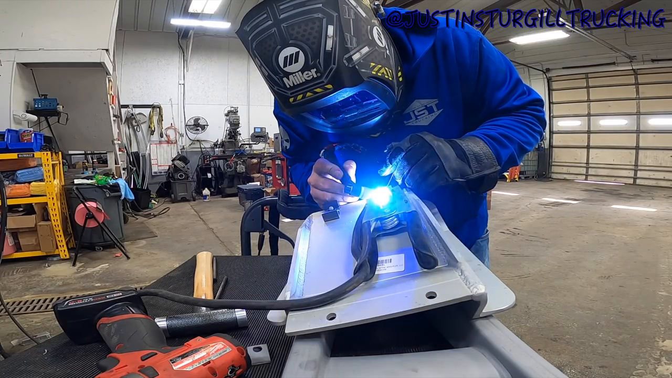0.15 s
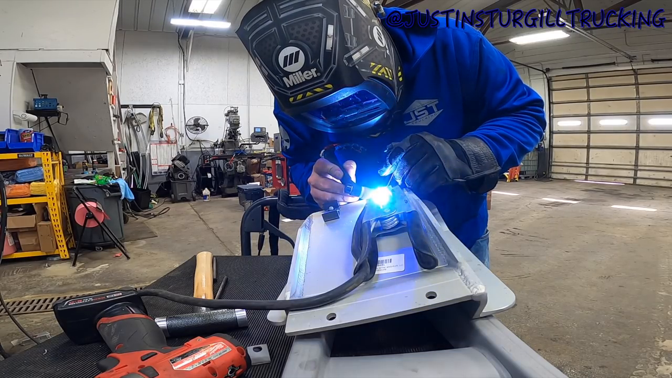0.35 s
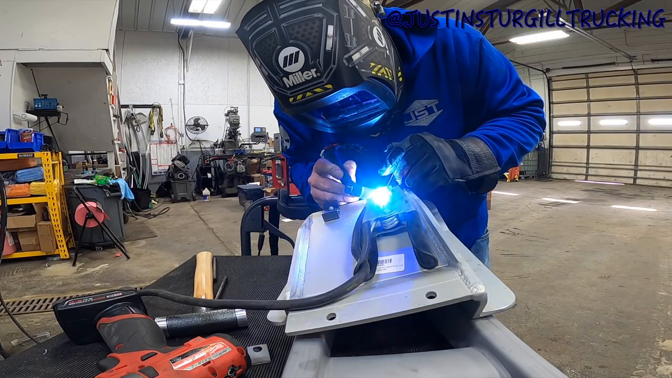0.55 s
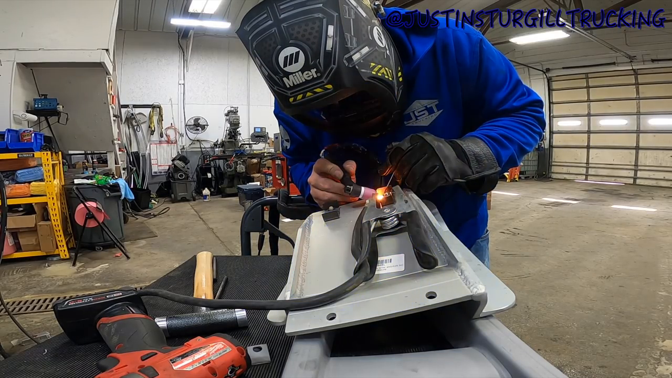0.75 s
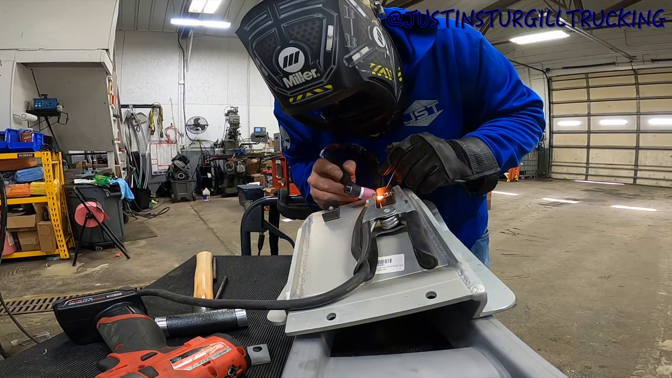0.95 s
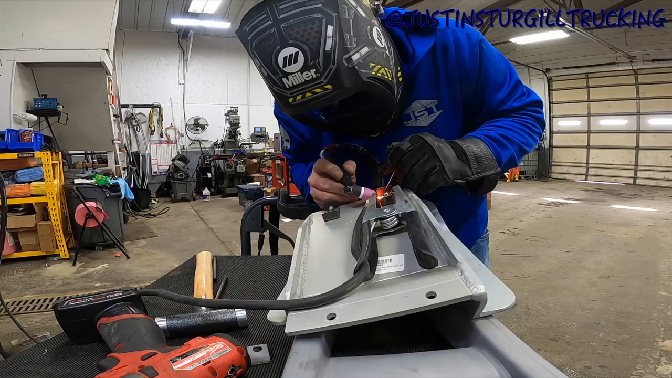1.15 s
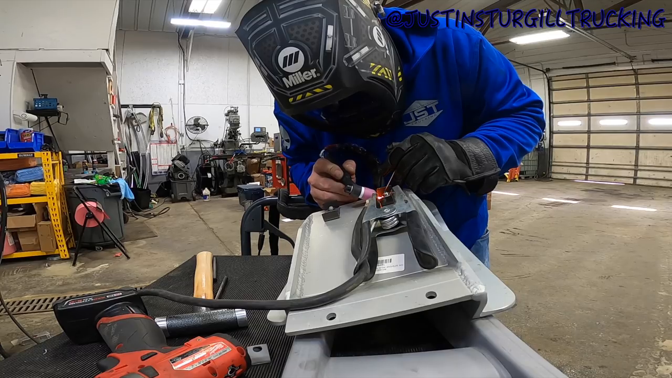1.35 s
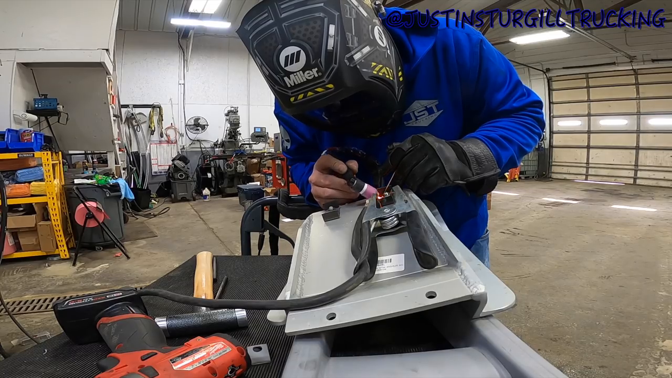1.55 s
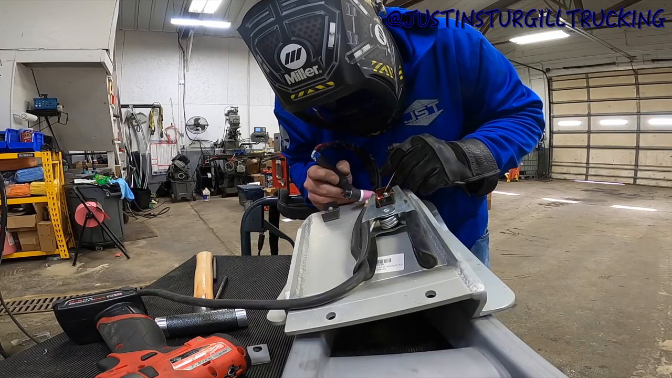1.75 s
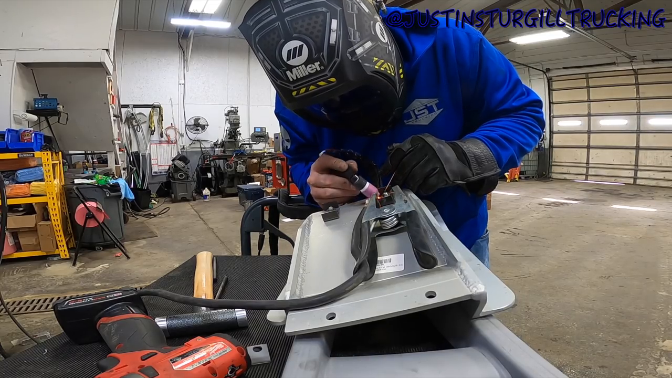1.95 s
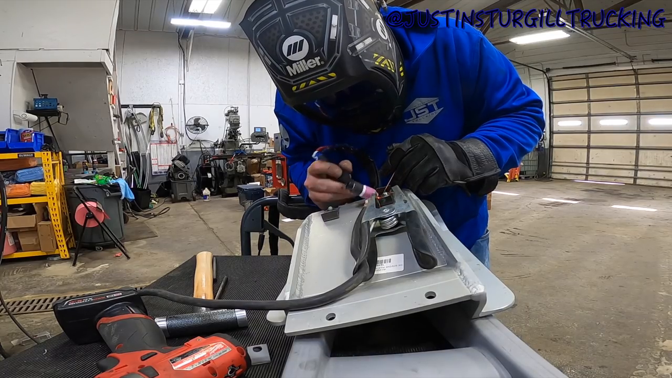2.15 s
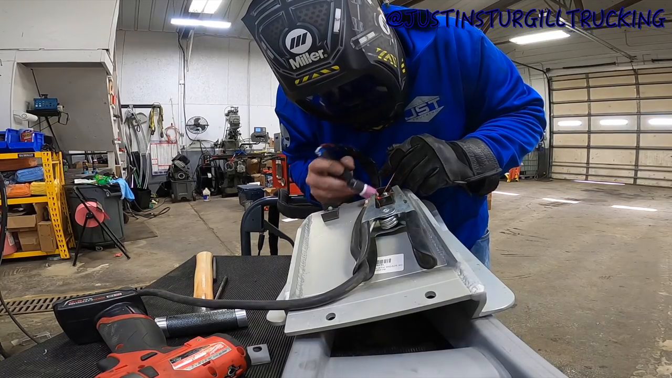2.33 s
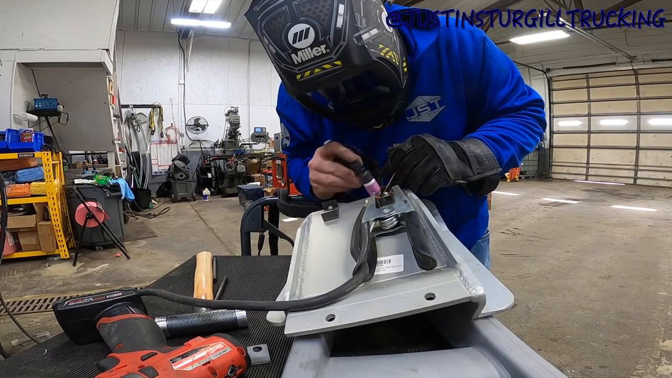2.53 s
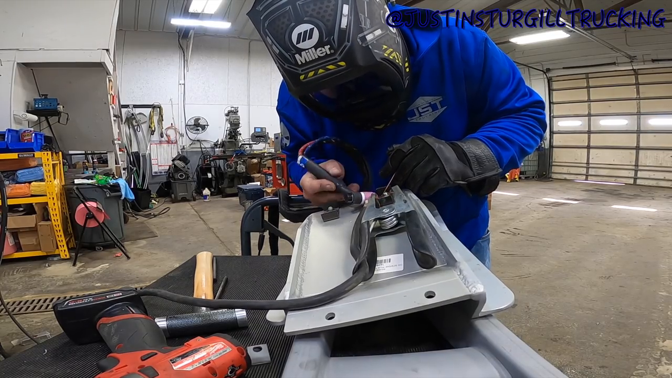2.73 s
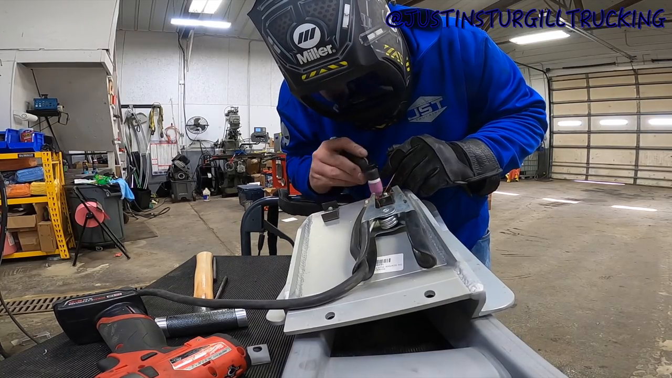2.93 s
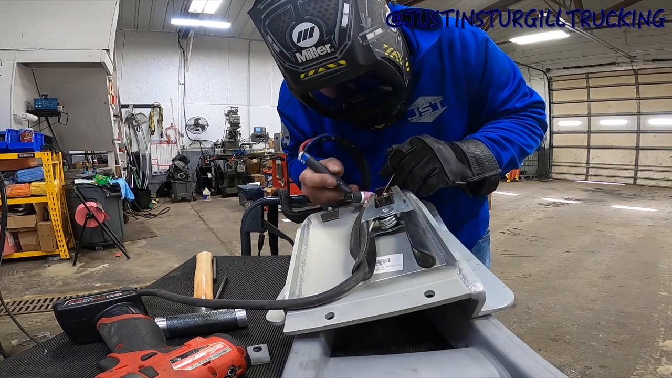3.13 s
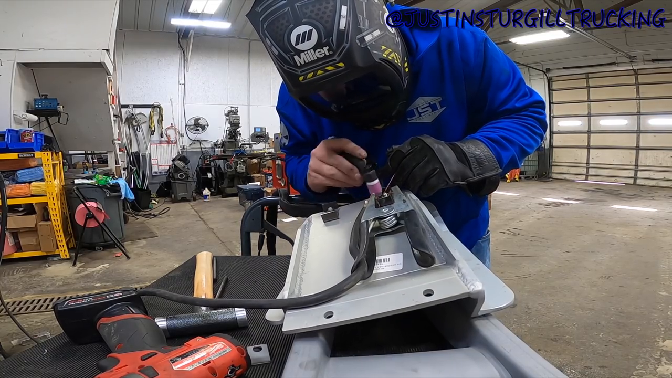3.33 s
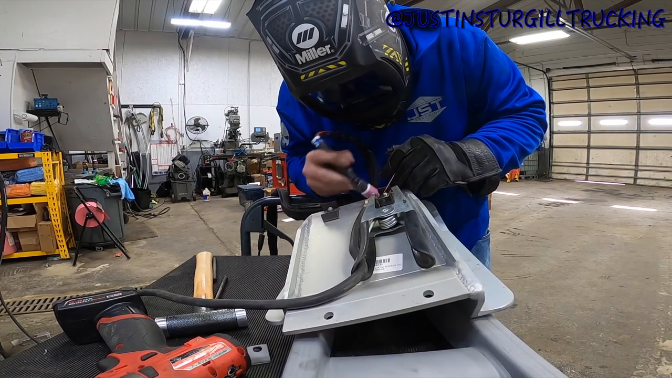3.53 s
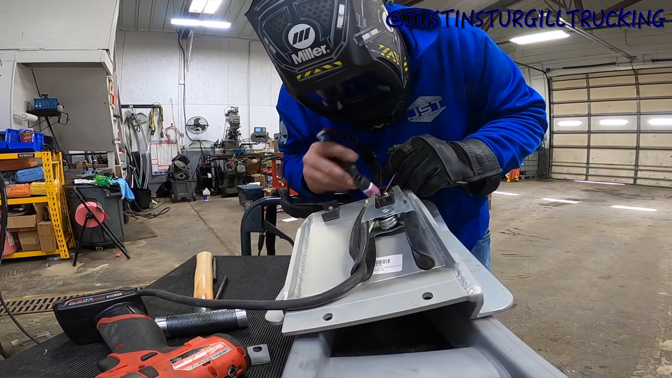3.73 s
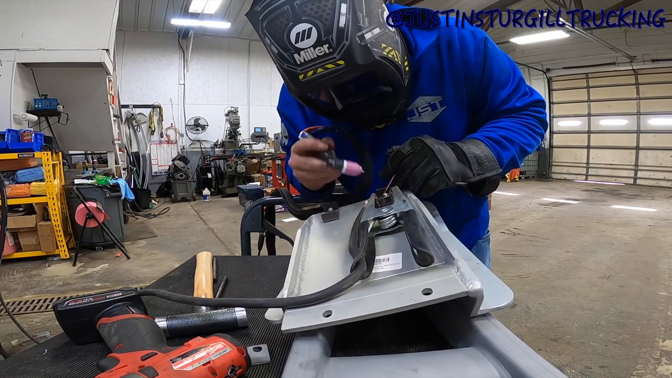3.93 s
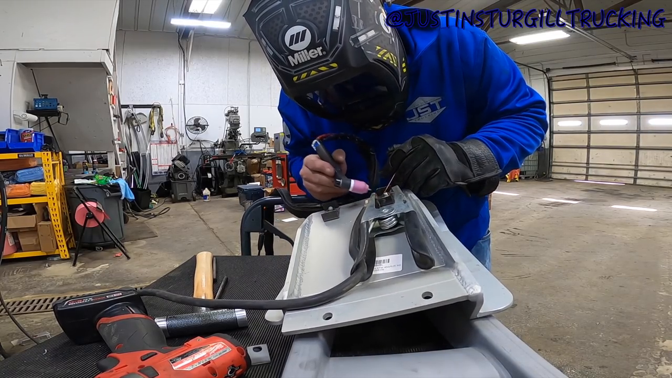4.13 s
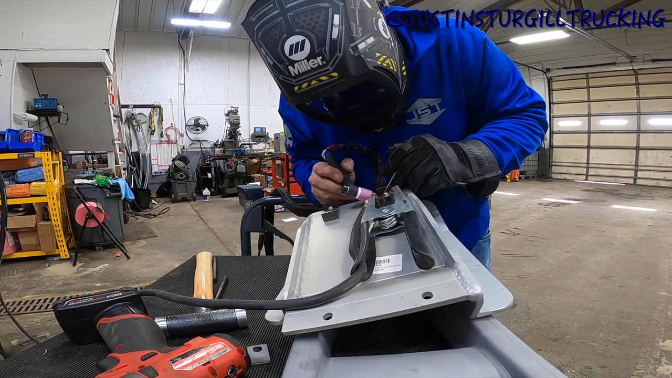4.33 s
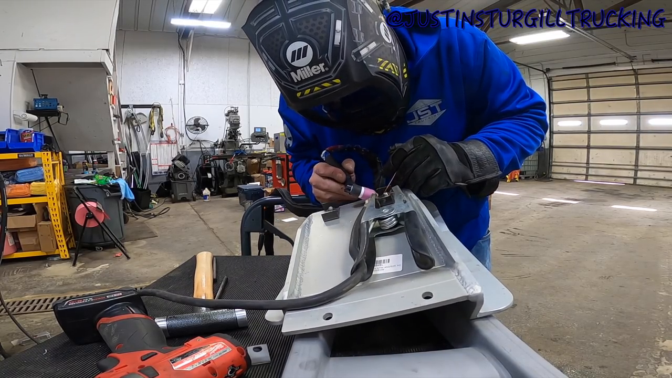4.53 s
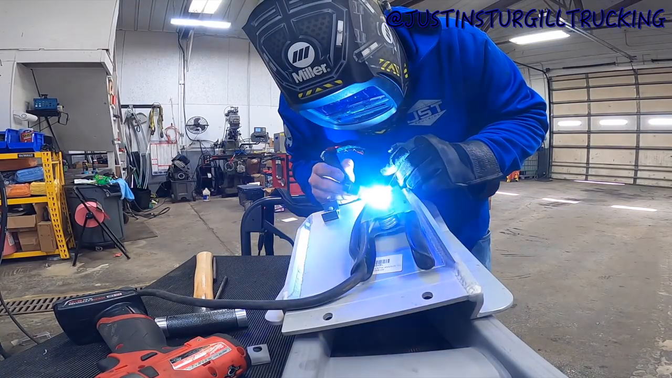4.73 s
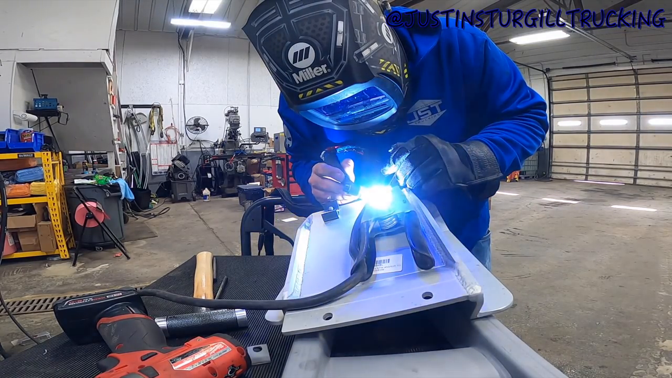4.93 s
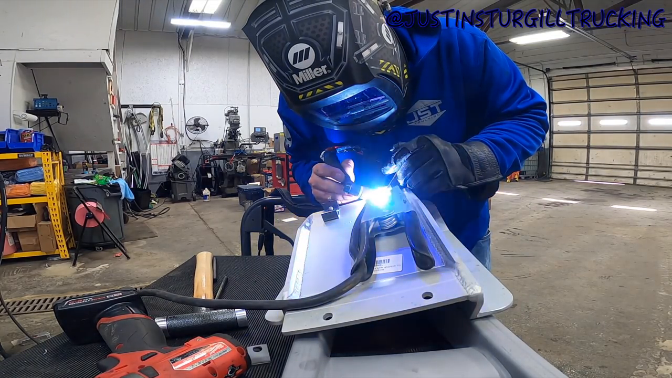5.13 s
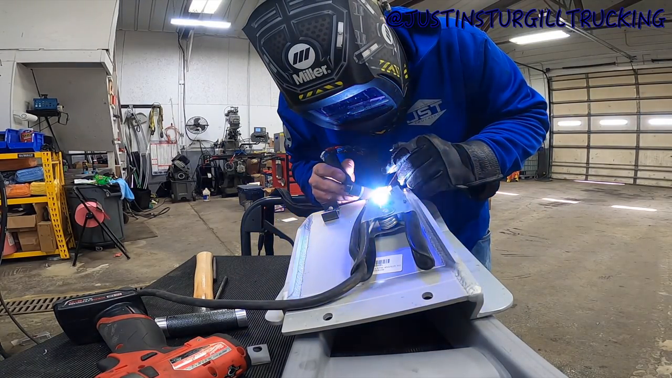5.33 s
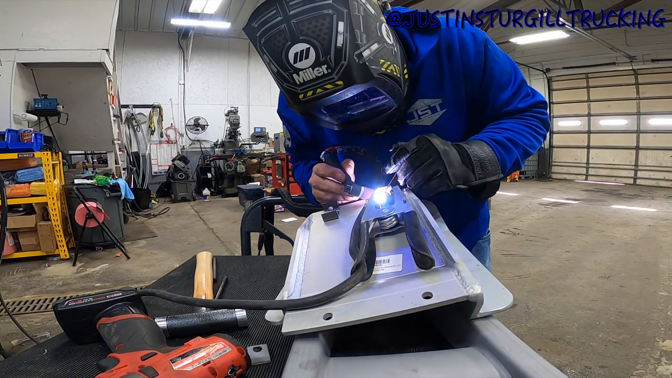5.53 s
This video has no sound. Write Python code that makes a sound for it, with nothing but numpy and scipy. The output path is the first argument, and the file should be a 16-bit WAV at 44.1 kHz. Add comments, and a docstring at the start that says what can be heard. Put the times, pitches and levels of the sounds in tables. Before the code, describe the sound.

A welder works close to the microphone. Steady airy gas hiss, with a quiet sputtering burn ending early; then gas alone over faint machine hum. The torch knocks and clinks on hollow metal, a lead rubs along it, and after a short pause the arc strikes abruptly with crackles and a much louder fizzing roar. Metal sounds leave a faint hall echo.

```python
"""Large workshop: a welder tacks small parts on a sheet-metal box, close to a small two-port microphone.
Shielding gas hisses from the torch cup throughout: noise through cup resonances. The arc burns twice and
roars, sizzles and spits: it swells the same jet, with flares and clicks on top. Between burns the torch taps
the box (decaying modes, noise cracks) and its lead drags (friction noise in resonances); soft low-mid noise
swells around them. Far machines: hum, fan tones, rumble, moving air; a faint echo follows the metal."""
import sys
import numpy as np
from scipy import signal
from scipy.fft import rfft, irfft, next_fast_len
from scipy.io import wavfile
from scipy.ndimage import uniform_filter1d

SR = 44100
rng = np.random.default_rng(int(sys.argv[2]) if len(sys.argv) > 2 else 0)


def log_audio(samples):
    """Write samples as a 16-bit WAV file to the path given in sys.argv[1]."""
    # one column per channel
    frames = np.atleast_2d(samples).T
    # limit to full scale, then quantise
    limited = np.clip(frames, -1, 1)
    pcm = np.round(limited * 32767).astype(np.int16)
    wavfile.write(sys.argv[1], SR, pcm)


N = 250488
T = np.arange(N) / SR
SIZE = next_fast_len(N + SR)
HZ = np.maximum(np.arange(SIZE // 2 + 1) * SR / SIZE, 1)


def from_db(db):
    """Decibels to gain."""
    return 10 ** (np.asarray(db) / 20)


def rms_one(x):
    """Scaled to unit power."""
    return x / np.sqrt(np.mean(x ** 2) + 1e-20)


def in_time(rows):
    """Curve columns at every sample."""
    s, *columns = np.transpose(rows)
    return [np.interp(T, s, c) for c in columns]


def column(rows, index):
    """One column of a frequency table at every spectral line, interpolated over log frequency."""
    return np.interp(np.log(HZ), np.log(np.array(rows)[:, 0]), np.array(rows)[:, index])


def filtered(x, response):
    """Sound through a spectral response."""
    return irfft(rfft(x, SIZE) * response, SIZE)[..., :N]


def causal(db):
    """Minimum-phase response for a dB curve, by folding its cepstrum."""
    cep = irfft(db * np.log(10) / 20, SIZE)
    cep[1:SIZE // 2] *= 2
    cep[SIZE // 2 + 1:] = 0
    return np.exp(rfft(cep))


def drift(rate_hz):
    """Slow chance with unit power: low-passed noise."""
    r = np.exp(-2 * np.pi * rate_hz / SR)
    return rms_one(signal.lfilter([1], [1, -2 * r, r * r], rng.standard_normal(N + SR))[SR:])


def peak(hz, width_hz):
    """Filter of one resonance, gain about 1 on top."""
    r = np.exp(-np.pi * width_hz / SR)
    return (1 - r * r) / 2 * np.array([1, 0, -1]), [1, -2 * r * np.cos(2 * np.pi * hz / SR), r * r]


def resonances(x, rows):
    """Parallel resonances, signs alternating, each passed twice for steep flanks."""
    out = 0
    for k, (hz, width_hz, db) in enumerate(rows):
        b, a = peak(hz, width_hz)
        out = out + (-1) ** k * from_db(db) * signal.lfilter(b, a, signal.lfilter(b, a, x))
    return out


def moving_resonance(x, centre_hz, width_hz):
    """Resonance on a moving pitch, retuned every 512 samples, passed twice."""
    out = np.zeros_like(x)
    first, second = np.zeros((2, 2)), np.zeros((2, 2))
    for i in range(0, N, 512):
        b, a = peak(centre_hz[i], width_hz)
        once, first = signal.lfilter(b, a, x[:, i:i + 512], zi=first)
        out[:, i:i + 512], second = signal.lfilter(b, a, once, zi=second)
    return out


def band(x, low_hz, high_hz):
    """Steep band-pass."""
    return signal.sosfilt(signal.butter(3, [low_hz, high_hz], "band", fs=SR, output="sos"), x)


def rms_band(x, low_hz, high_hz):
    """Band-pass that keeps the level of white noise."""
    return np.sqrt(SR / 2 / (high_hz - low_hz)) * band(x + 1e-18, low_hz, high_hz)


# the arc burns, one list per burn: time_s, roar_level_db
BURNS = [
    [(0, -38), (.3, -47.5), (.5, -39.5), (.73, -43)],
    [(4.7365, -29.5), (4.92, -28), (5.2, -27), (5.25, -36), (5.5, -34.5), (5.7, -55)],
]


def arc_level():
    """Strength of the arc in dB, and a gate that is open while it burns."""
    lit = sum((T >= rows[0][0]) * (T <= rows[-1][0]) for rows in BURNS)
    gate = uniform_filter1d(lit.astype(float), size=200, mode="nearest")
    return in_time(np.concatenate(BURNS))[0], gate


SWING_S, SWING_OUT_S, SWING_BACK_S, SWING_DB = 4.113, 0.14, 0.12, -16


def swing_db():
    """The cup swings away from the microphone once: the hiss dips and returns as two Gaussian halves."""
    return SWING_DB * np.exp(-((T - SWING_S) / np.where(T < SWING_S, SWING_OUT_S, SWING_BACK_S)) ** 2)


# cup-to-work resonance: time_s, pitch_hz
GAP = [(0, 2586), (1.6, 2577), (2.3, 2486), (2.7, 2430), (3.74, 2410), (4.7, 2550), (4.85, 2660),
       (5.68, 2560)]
GAP_WIDTH_HZ, GAP_DB, GAP_MEAN_HZ = 500, -3.5, 2552
# fixed resonance of the cup: pitch_hz, width_hz, level_db
CUP = [(3380, 550, 0)]
# roar of the jet, relative levels: pitch_hz, width_hz, level_db
ROAR = [(1620, 520, -1), (2160, 840, 2)]
# low resonance that only the arc excites: pitch_hz, width_hz, level_db
ARC_GROWL = [(1398, 550, 0)]
# colour of the hot sizzle against the cold gas, relative: pitch_hz, level_db
ARC_COLOUR = [(4200, 0.5), (4600, -8), (5200, -0.5), (6300, 4.5), (6900, 6), (7400, 1), (7900, 7.5),
              (9000, -0.5), (10600, 8), (12500, 0), (14800, 3)]
# bright band in the sizzle, moves with the hand: time_s, pitch_hz, level_over_sizzle_db
BRIGHT = [(0, 9100, 10), (0.7, 9000, 7), (1.6, 8850, 8), (2.1, 8500, 0), (2.5, 8900, -3), (3.5, 8850, 0),
          (3.72, 8700, 6), (4.0, 8800, 12), (4.08, 8850, -19), (4.17, 9050, 15), (4.3, 8550, -3),
          (4.7, 8450, 2), (4.8, 7850, 1), (5.68, 7900, -14)]
BRIGHT_WIDTH_HZ = 1050
GAS_DB, GAS_ROAR_DB, GAS_SIZZLE_DB = -32, -38.5, -44
SIZZLE_DB_PER_HZ = 0.0055   # stronger while the gap rings higher
SWING_ROAR_SHARE, SWING_SIZZLE_SHARE = 0.26, 0.17   # of the dB dip of the hiss
ARC_HISS_OVER_ROAR_DB, ARC_GROWL_OVER_ROAR_DB = -3, -8.5
ARC_SIZZLE_DB, SIZZLE_REF_ROAR_DB, SIZZLE_DB_PER_DB = -38, -32.5, 0.32
ARC_BASS_DB, BASS_REF_ROAR_DB, BASS_DB_PER_DB, BASS_FLUTTER_DB = -48.5, -28.5, 1, 1.5
GUST_DB = 0.7


def torch(jet):
    """Turbulent gas in the cup resonances, with roar and sizzle; arc and flares swell all of them at once."""
    gap_hz, = in_time(GAP)
    bright_hz, bright_db = in_time(BRIGHT)
    away_db = swing_db()
    arc_db, lit = arc_level()
    gust_db = GUST_DB * drift(15)

    gap = from_db(GAP_DB) * moving_resonance(jet, gap_hz, GAP_WIDTH_HZ)
    gas = rms_one(gap - resonances(jet, CUP))
    roar = rms_one(resonances(jet, ROAR))
    growl = from_db(ARC_GROWL_OVER_ROAR_DB) * rms_one(resonances(jet, ARC_GROWL))
    bass = rms_one(band(jet, 157, 680))
    cold = rms_one(band(jet, 3010, 22000))
    hot = rms_one(filtered(cold, causal(column(ARC_COLOUR, index=1))))

    # cold jet and arc add in power
    gas_gain = np.hypot(from_db(GAS_DB + away_db), lit * from_db(arc_db + ARC_HISS_OVER_ROAR_DB))
    roar_gain = np.hypot(from_db(GAS_ROAR_DB + SWING_ROAR_SHARE * away_db), lit * from_db(arc_db))
    out = gas_gain * from_db(gust_db) * gas - roar_gain * from_db(0.45 * gust_db) * roar

    dulled = from_db(SWING_SIZZLE_SHARE * away_db) * cold
    bright = from_db(bright_db) * moving_resonance(cold, bright_hz, BRIGHT_WIDTH_HZ)
    cold_db = GAS_SIZZLE_DB + SIZZLE_DB_PER_HZ * (gap_hz - GAP_MEAN_HZ)
    hot_db = ARC_SIZZLE_DB + SIZZLE_DB_PER_DB * (arc_db - SIZZLE_REF_ROAR_DB)
    sizzle = from_db(cold_db) * ((1 - lit) * dulled + bright) + lit * from_db(hot_db) * hot
    # lower and upper sizzle flicker apart
    out += from_db(0.63 * gust_db + 1.7 * drift(9.9)) * band(sizzle, 2380, 8350)
    out += from_db(1.5 * drift(9.3)) * band(sizzle, 7300, 15000)

    bass_db = ARC_BASS_DB + BASS_DB_PER_DB * (arc_db - BASS_REF_ROAR_DB) + BASS_FLUTTER_DB * drift(22)
    out += lit * (from_db(bass_db) * bass + from_db(arc_db) * growl)
    return out + flares(gas - roar + growl, hot, bass)


# the arc flares: start_s, level_db, length_s, treble_over_level_db
FLARES = [(0.3, -35, 0.06, -7), (0.417, -38, 0.035, -2), (0.535, -34, 0.022, -12), (0.583, -32.5, 0.03, -6),
          (4.668, -56, 0.025, 14), (4.7368, -17, 0.025, -4.5), (4.761, -19, 0.024, -22),
          (4.77, -29, 0.022, -7), (4.788, -30.5, 0.032, -2.5), (4.811, -19.5, 0.034, -11),
          (4.84, -20, 0.011, -10), (4.843, -40, 0.04, 1), (4.89, -39, 0.06, -4), (5.138, -27, 0.039, -38),
          (5.153, -43, 0.066, -29), (5.183, -25.5, 0.05, -41)]
FLARE_RISE_S, FLARE_FALL_S, FLARE_BASS_DB = 0.0031, 0.011, -24
SPLUTTER_DB, SPIT_DB = 1.6, 1.0


def flares(body, hot, bass):
    """Short swells of jet, spitting treble and bass; the arc column jumps about, so the level splutters."""
    out = np.zeros((2, N))
    splutter = from_db(SPLUTTER_DB * drift(160))
    spitting = rms_one(from_db(SPIT_DB * drift(400)) * hot)
    for s, db, length_s, treble_db in FLARES:
        i = slice(round(s * SR), round((s + length_s) * SR))
        rise, fall = (T[i] - s) / FLARE_RISE_S, (s + length_s - T[i]) / FLARE_FALL_S
        swell = from_db(db) * splutter[i] * np.clip(np.minimum(rise, fall), 0, 1)
        mix = 0.47 * body[:, i] + from_db(treble_db) * spitting[:, i] + from_db(FLARE_BASS_DB) * bass[:, i]
        out[:, i] += swell * mix
    return out


# single sparks: start_s, level_db, extra_treble_db
POPS = [(0.3152, -13, 0), (0.4198, -12, 0), (0.597, -14, 2), (4.7372, 2, -3), (4.7418, 0, -2),
        (4.7495, 0, -2), (4.7638, -2, -8), (4.769, 0, -9), (.7297, 1, 7)]
POP_TREBLE_DB = 5.5   # bare edge of every click, before the ports dull it


def pops():
    """Sparks as single-sample clicks through a body band and a treble band."""
    body, edge = np.zeros((2, N))
    for s, db, treble_db in POPS:
        body[round(s * SR)] = from_db(db)
        edge[round(s * SR)] = from_db(db + treble_db + POP_TREBLE_DB)
    # make-up gain for height lost in the bands
    body_gain, edge_gain = SR / 2 / 5000, SR / 2 / 12400
    return body_gain * band(body + 1e-18, 1620, 3400) + edge_gain * band(edge + 1e-18, 6200, 14000)


# torch on box, ring_share scales every t60 (hand on the box), floor 0.1:
# start_s, rim_db, lip_db, wall_db, flange_db, panel_db, ring_share
TAPS = [(1.793, -42, -41, -25, -40, -33, 0.17), (2.4924, -6, -34, -20, -36, -41, 0.56),
        (2.548, -49, -51, -57, -35, -32, 0.37), (2.6407, -27, -44, -25, -15.5, -20.5, 0.54),
        (2.6444, -23, -22, -17, -27, -25, 0.05), (2.666, -24, -27, -14, -3.5, -7, 0.13),
        (2.671, -21, -12, -10, -25, -18, 0.21), (2.675, -34, -36, -43, -9.5, -9, 0.25),
        (2.7072, -35, -25, -29, -14, -14.5, 0.19), (2.809, -36, -31, -20, -15.5, -20.5, 0.17),
        (2.8528, -15, -24, -19, -17, -28.5, 0.53), (2.9683, -29.5, -33.5, -27, -20, -24.5, 0.35),
        (3.0225, -26, -23, -17, -24, -32, 0.32), (3.0457, -29, -28, -26, -18.5, -19.5, 0.2),
        (3.1424, -26, -24, -24, -15, -23, 0.35), (3.1932, -3, -38, -12.5, -14.5, -23.5, 0.46),
        (3.3367, -34, -39, -27, -18.5, -20, 0.4), (3.359, -14, -6, -11, -7.5, -36, 0.26),
        (3.3693, -21, -35, -39, -7.5, -8.5, 0.25), (3.3815, -36, -38, -32, -13.5, -14, 0.36),
        (3.519, -42, -42, -21, -18, -21, 0.36), (3.555, -5, -33, -17, -19, -24, 0.4),
        (3.7179, -18, -22, -12, -23, -22, 0.27), (3.8736, -17, -9.5, -29, -21, -29, 0.21),
        (3.8808, -15, -9.5, -19, -18, -22.5, 0.22), (3.897, -8, -24.5, -20, -20.5, -19, 0.29),
        (3.9018, -25, -31, -35, -35, -35, 0), (4.1995, -38, -38, -24, -20.5, -31, 0.41)]
PAN_SPREAD_DB, MODE_SPREAD_DB = 0.8, 2
DETUNE_SHARE = 0.01   # the grip shifts a mode from tap to tap
LATE_HZ, LATE_WIDTH_HZ, LATE_RADIANS = 702, 160, 1.36   # modes near here: left port out of step


def strike(modes, index, lag_s, contact_s):
    """Every tap rings each mode with a strength and side of its own; the ring grows over the contact time."""
    out, t = np.zeros((2, N + SR)), T[:SR // 3]
    hz, db, t60_s = np.transpose(modes)[:, :, None]
    late = LATE_RADIANS * np.exp(-((hz - LATE_HZ) / LATE_WIDTH_HZ) ** 2)
    for tap in TAPS:
        strength, side, grip = rng.standard_normal((3, len(modes), 1))
        phase = 2 * np.pi * hz * (1 + DETUNE_SHARE * grip) * t
        decay_db = 60 * t / (t60_s * np.clip(tap[-1], .1, 1.5))
        size = from_db(tap[index] + db + MODE_SPREAD_DB * strength - decay_db) * (1 - np.exp(-t / contact_s))
        left = size * from_db(PAN_SPREAD_DB * side) * np.sin(phase - late)
        right = size * from_db(-PAN_SPREAD_DB * side) * np.sin(phase)
        rim_over_flange = tap[1] > tap[4]
        at = round((tap[0] + lag_s * rim_over_flange) * SR)
        out[:, at:at + len(t)] += [np.sum(left, axis=0), np.sum(right, axis=0)]
    return out[:, :N]


# modes of the box rim: pitch_hz, level_db, t60_s
RIM = [(1786, -2.5, 0.15), (1872, 5, 0.062), (1948, -0.5, 0.051), (2094, -0.5, 0.026), (2210, -0.5, 0.048),
       (2160, -26, 0.059), (2580, -18.5, 0.1)]
# modes of the lip: pitch_hz, level_db, t60_s
LIP = [(1639, 3, 0.1), (1580, -12.5, 0.056)]
# modes of the wall: pitch_hz, level_db, t60_s
WALL = [(1117, -8, 0.029), (1310, -8, 0.052), (1403, 6, 0.1)]
# modes of the flange: pitch_hz, level_db, t60_s
FLANGE = [(518, 1.5, 0.075), (515.5, 1, 0.13), (580, 1, 0.049), (715, -9, 0.032), (859, 5, 0.044),
          (1030, -8.5, 0.07)]
# modes of the wide panel: pitch_hz, level_db, t60_s
PANEL = [(183, -7, 0.15), (281, -6, 0.16), (466, -10, 0.36), (467, -5, 0.34), (612, -13, 0.42),
         (688, -4, 0.38), (766.5, -5.5, 0.28), (801, -9, 0.21), (964, -12.5, 0.25), (1066, -14.5, 0.2)]
PANEL_LAG_S, CONTACT_S = 0.00292, 0.0035
RIM_CONTACT_S = 0.0014   # stiff rim and lip are met faster


def box():
    """Rim, lip and wall answer at once, flange and panel a little later when the rim outweighs the flange."""
    out = strike(RIM, index=1, lag_s=0, contact_s=RIM_CONTACT_S)
    out += strike(LIP, index=2, lag_s=0, contact_s=RIM_CONTACT_S)
    out += strike(WALL, index=3, lag_s=0, contact_s=CONTACT_S)
    out += strike(FLANGE, index=4, lag_s=PANEL_LAG_S, contact_s=CONTACT_S)
    out += strike(PANEL, index=5, lag_s=PANEL_LAG_S, contact_s=CONTACT_S)
    return out


# cracks of hard contacts: start_s, level_db, treble_over_level_db, snap_over_level_db
CRACKS = [(2.49, -15, 0, -22), (2.857, -33, 9, -8), (3.3573, -30, 3, -8), (3.5558, -20.5, 5, 15),
          (3.718, -22, 3, 0), (3.875, -21, 5, -9), (3.8804, -18, -1, -20), (3.8951, -9, -8, -2.5),
          (3.9006, -9, -7, -10), (3.908, -17, 3.5, -22)]
CRACK_T60_S, CRACK_EDGE_T60_S, SNAP_T60_S = 0.045, 0.05, 0.011


def cracks():
    """Hard contacts crack: short dying noise bursts in three bands, the snap dying first."""
    body, edge, snap = np.zeros((3, N + SR))
    t = T[:SR // 20]
    for s, db, treble_db, snap_db in CRACKS:
        grit = rng.standard_normal(len(t))
        i = slice(round(s * SR), round(s * SR) + len(t))
        body[i] += from_db(db - 60 * t / CRACK_T60_S) * grit
        edge[i] += from_db(db + treble_db - 60 * t / CRACK_EDGE_T60_S) * grit
        snap[i] += from_db(db + snap_db - 60 * t / SNAP_T60_S) * grit
    return rms_band(body[:N], 2140, 2840) + rms_band(edge[:N], 4250, 5200) + rms_band(snap[:N], 4500, 13000)


# swell of high ring, low ring, rumble, and one catch of the high ring:
# loudest_s, level_db, rise_db_per_s, fall_db_per_s
DRAG = [(4.117, -37.5, 37, 43), (4.25, -35, 114, 80), (3.94, -29.5, 60, 100), (4.0685, -19, 12000, 4000)]
# high ring of the box walls: pitch_hz, width_hz, level_db
DRAG_HIGH = [(880, 170, -1), (1090, 120, -0.3)]
# low ring of the box walls: pitch_hz, width_hz, level_db
DRAG_LOW = [(750, 260, 0)]
# rumble of the panel, relative levels: pitch_hz, width_hz, level_db
DRAG_RUMBLE = [(129, 48, 7.5), (225, 120, 3.5), (324, 130, 0.5), (473, 140, 2.5)]
DRAG_START_S, RUSTLE_OVER_HIGH_DB, RUB_ROUGH_DB = 3.86, 9, 0.8


def drag():
    """The lead slides once: uneven friction rings the box walls, rumbles in the panel, rustles at the top."""
    moving = np.clip((T - DRAG_START_S) / 0.009, 0, 1)
    high, low, rumble, catch = [from_db(db - np.where(T < s, rise * (s - T), fall * (T - s)))
                                for s, db, rise, fall in DRAG]
    rub = noise() * from_db(RUB_ROUGH_DB * drift(58))
    out = (high + catch) * rms_one(resonances(rub, DRAG_HIGH))
    out += low * rms_one(resonances(rub, DRAG_LOW))
    out += high * from_db(RUSTLE_OVER_HIGH_DB) * rms_one(band(rub, 9800, 13500))
    out += rumble * rms_one(resonances(rub, DRAG_RUMBLE))
    return moving * out


# soft low-mid noise: time_s, level_db
LOW_MID = [(0.0, -60), (0.81, -53.5), (1.49, -58.5), (3.34, -48), (3.75, -61), (4.08, -42), (4.51, -49),
           (5.68, -57)]


def low_mid():
    """Soft noise, 256-532 Hz, that swells around the taps and the drag."""
    return from_db(in_time(LOW_MID)[0]) * rms_one(band(noise(), 256, 532))


# motor hum, lower and upper: pitch_hz, width_hz, level_db
HUM = [(71.5, 8, 0), (81.3, 1.6, 0)]
# fan tones, relative levels: pitch_hz, level_db
FAN = [(153.8, -0.5), (240, -3.5)]
# spectrum of the moving air, relative: pitch_hz, level_db
AIR = [(40, -32), (95, -3.5), (130, -2), (200, -10), (300, -25), (450, -47), (630, -25.5), (800, -14.5),
       (1300, -13), (1500, -10), (1950, -58), (3300, -87)]
HUM_DB, UPPER_HUM_OVER_LOWER_DB, FAN_DB, RUMBLE_DB, AIR_DB = -49.5, -4, -52.5, -52, -49.5
HUM_SWELL_S, HUM_SWELL_LENGTH_S, HUM_SWELL_DB = 4.33, 1, 10.5   # the upper hum swells once
FAN_WAVER_DB, FAN_WAVER_RADIANS = 1.2, 0.83
HUSH_S, HUSH_FADE_S, HUSH_DB = 4.06, 0.79, -5   # hum, fan, rumble and air sink towards the end
WHINE_HZ, WHINE_DB, WHINE_S = 808, -60, (1.0, 2.03)   # faint tone, 0.1 s fades outside this span
THUMP_S, THUMP_HZ, THUMP_DB, THUMP_LENGTH_S = 0.15, 19.8, -33.5, 0.09


def shop():
    """Narrow-noise motor hum, wavering fan tones, rumble, whine, a low thump and moving air."""
    far = noise()
    swell_db = HUM_SWELL_DB * np.exp(-((T - HUM_SWELL_S) / HUM_SWELL_LENGTH_S) ** 2)
    upper_hum = from_db(UPPER_HUM_OVER_LOWER_DB + swell_db) * rms_one(resonances(far, HUM[1:]))
    steady = from_db(HUM_DB) * (rms_one(resonances(far, HUM[:1])) + upper_hum)
    for hz, db in FAN:
        level = from_db(FAN_DB + db + FAN_WAVER_DB * drift(2.3))
        steady += level * np.sin(2 * np.pi * hz * T + FAN_WAVER_RADIANS * drift(2.7))
    steady += from_db(RUMBLE_DB) * rms_one(band(far, 31.7, 62.6))
    steady += from_db(AIR_DB) * rms_one(filtered(noise(), from_db(column(AIR, index=1))))
    hush = from_db(HUSH_DB * np.clip((T - HUSH_S) / HUSH_FADE_S, 0, 1))

    thump = np.exp(-((T - THUMP_S) / THUMP_LENGTH_S) ** 2) * np.sin(2 * np.pi * THUMP_HZ * T)
    whine_fade = np.interp(T, [WHINE_S[0] - .1, *WHINE_S, WHINE_S[1] + .1], [0, 1, 1, 0])
    whine = whine_fade * np.sin(2 * np.pi * WHINE_HZ * T + drift(6.2))
    return from_db(THUMP_DB) * thump + from_db(WHINE_DB) * whine + hush * steady


SHOP_T60_S, ECHO_DB = 0.42, -28.5


def echoes(x):
    """The hall answers with a dull, decaying noise tail after 8 ms."""
    t = T[:SR]
    tail = band(noise()[:, :SR], 120, 1360) * from_db(-60 * t / SHOP_T60_S) * (t > .008)
    return signal.fftconvolve(x, tail / np.sqrt(np.sum(tail ** 2) / 2), axes=1)[:, :N]


# how sound reaches the two ports: pitch_hz, left_db, right_db, likeness_share
PORTS = [(150, -4, -3.5, 0.98), (790, -2, -1.5, 0.84), (1850, -1, -1, 1), (3770, -6.5, -10.5, 0.94),
         (3744, -3, 0, 1), (4430, -20, -33, 0.85), (4640, -11.5, -12, 0.53), (6590, -24, -16, 0.85),
         (7440, -29.5, -23.5, 0.42), (9580, -52.5, -26, 0.28), (10330, -47.5, -34.5, .15),
         (11050, -57, -33.5, 0.41), (13600, -45, -34, .25), (14500, -57.5, -78.5, .1)]


def ports(*sounds):
    """Each port colours the sounds in its own way."""
    return filtered(np.array(sounds), np.array([causal(column(PORTS, index=1)), causal(column(PORTS, index=2))]))


def noise():
    """White noise at both ports, alike as far as the likeness column says."""
    shared, own = rfft(rng.standard_normal((2, SIZE)))
    alike = np.clip(column(PORTS, index=3), 0, 1)
    return irfft(np.sqrt(1 + alike) * shared + np.sqrt(1 - alike) * own * [[1], [-1]], SIZE)[:, :N]


def scene():
    """All sources: jet and contacts through the ports, plus echo, low-mid noise and shop."""
    metal = box() + drag()
    jet, contacts = ports(noise(), metal + pops() + cracks())
    return torch(jet) + contacts + from_db(ECHO_DB) * echoes(metal) + low_mid() + shop()


LEFT_LAG_S = 7.2e-5


def lagged(x, above_hz):
    """Delays the left channel above the given pitch, leaving the lower part in step."""
    late = 1 / (1 + np.exp(-np.clip((HZ - above_hz) / 40, -50, 50)))
    return filtered(x, np.exp(-2j * np.pi * HZ * LEFT_LAG_S * late))


# between these times the left lag reaches further down and the image is wider
WIDE_S, WIDE_LAG_ABOVE_HZ, LAG_ABOVE_HZ = (2.47, 4.2), 790, 3010
CUTOFF_HZ = 15600


def record(dry):
    """Left-channel lag, tanh-rounded peaks and a cut top."""
    wide = np.clip((T - WIDE_S[0]) / 0.022, 0, 1) * np.clip((WIDE_S[1] - T) / 0.016, 0, 1)
    left = wide * lagged(dry[0], WIDE_LAG_ABOVE_HZ) + (1 - wide) * lagged(dry[0], LAG_ABOVE_HZ)
    rounded = 1.643 * np.tanh(np.array([left, dry[1]]) / 1.41)
    return signal.sosfilt(signal.ellip(10, .5, 70, CUTOFF_HZ, fs=SR, output="sos"), rounded)


dry = scene()
out = record(dry)
log_audio(out)
```